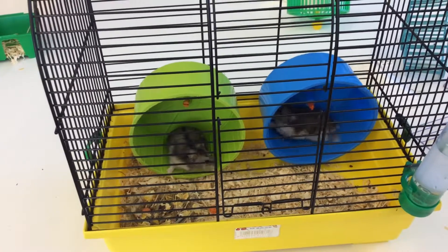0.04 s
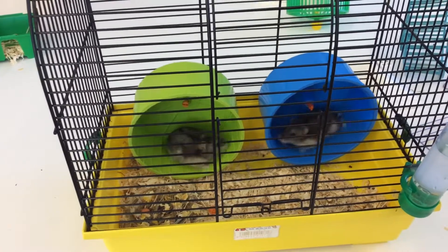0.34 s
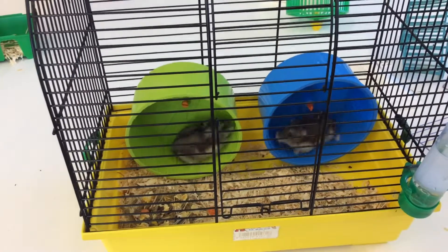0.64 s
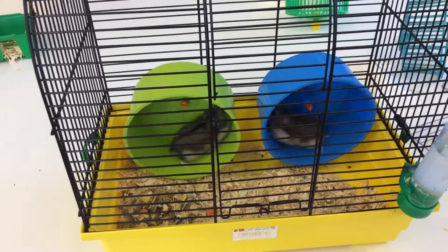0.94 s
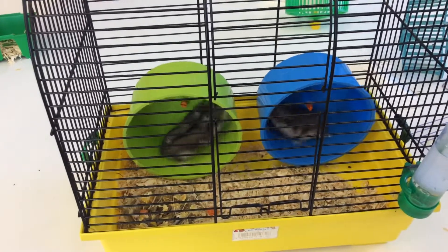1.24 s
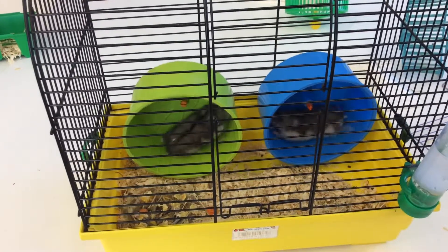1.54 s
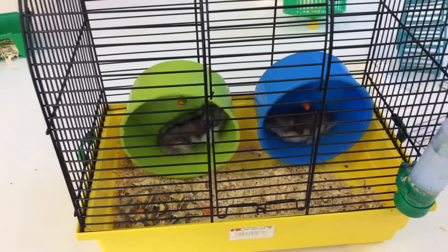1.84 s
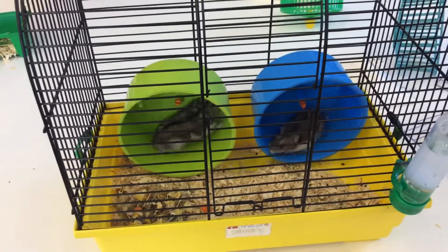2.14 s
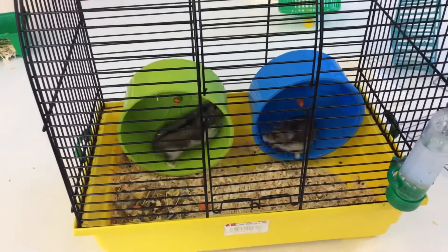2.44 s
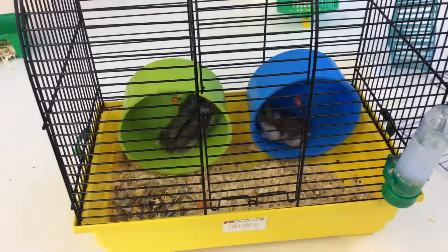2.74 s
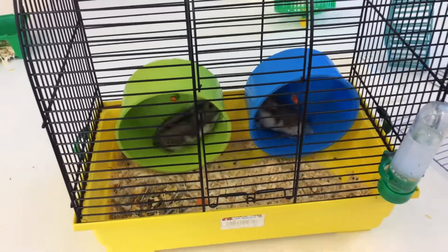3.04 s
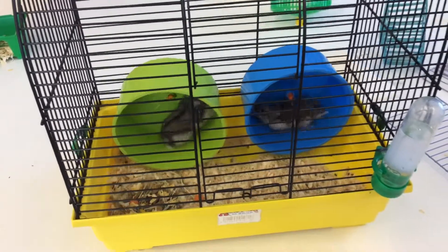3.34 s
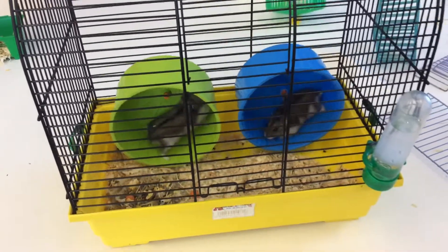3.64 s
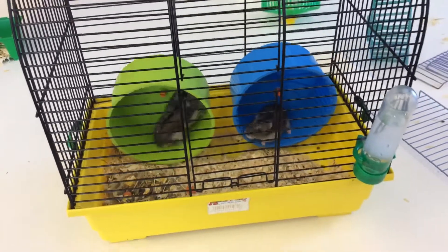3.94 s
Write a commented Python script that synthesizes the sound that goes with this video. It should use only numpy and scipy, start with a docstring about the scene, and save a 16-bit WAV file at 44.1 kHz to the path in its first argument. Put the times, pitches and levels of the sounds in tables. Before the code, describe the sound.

Hamsters run in plastic wheels, which knock and rattle with a faint axle squeak in the first half second. A softly rumbling lull follows. High squeaks return at about 1.1 seconds, joined by harder knocks and hollow thuds until 2. Claws patter and scrabble from 2 to 3 seconds. More knocks lead into the loudest squeaks, from 3.2 to 3.7, and two last knocks sound over a faint room hush.

```python
"""Two hamsters run in plastic wheels in a wire cage, in a small room. At first the wheels knock on their
loose axles, each impact ringing their modes, and a dry axle squeaks faintly by stick-slip friction.
In a lull the tray rumbles under soft footfalls. After a second the squeaks return, then harder knocks
and the hollow thuds of running bodies. Claws patter and scrabble on the plastic through the third
second; the loudest bout of squeaks follows, and two last knocks sound over the still air."""
import sys
import numpy as np
from scipy import signal
from scipy.fft import rfft, irfft
from scipy.io import wavfile

SR = 44100
rng = np.random.default_rng(int(sys.argv[2]) if len(sys.argv) > 2 else 0)


def master(y):
    """Save y as 16-bit WAV."""
    cut = np.clip(np.atleast_2d(y).T, -1, 1)
    pcm = np.round(cut * 32767)  # scale
    wavfile.write(sys.argv[1], SR, pcm.astype(np.int16))


N = 176400
TIME = np.arange(N) / SR

# Levels in the tables are relative, within each table.
# impacts of a wheel on its axle: start_s, level_db, heaviness_db (heavier is duller)
KNOCKS = [(0.014, -35.5, -11.5), (0.024, -38.5, -9), (0.065, -32, 0.5), (0.111, -38, -11),
          (0.147, -32, -1.5), (0.172, -39.5, -11.5), (0.223, -34, -10), (0.234, -36, -1),
          (0.286, -33, -5.5), (0.444, -44, -10), (0.566, -46, -14.5), (1.147, -46, -8), (1.332, -30.5, -7),
          (1.356, -42.5, -13.5), (1.397, -35.5, -11), (1.418, -31, -0.5), (1.462, -35, -11),
          (1.472, -30, -7), (1.508, -31.5, -14), (1.541, -28, 6), (1.606, -37, -15), (1.629, -38, -6),
          (1.741, -37, 1), (1.839, -41.5, -9), (1.895, -41.5, -8), (1.945, -32.5, 0), (2.065, -40.5, -9),
          (2.276, -38.5, -13.5), (2.2864, -28.5, -15), (2.549, -45.5, -8), (2.924, -41.5, -4),
          (3.017, -46, -15), (3.076, -35, -1), (3.097, -33, -3.5), (3.126, -38, -6), (3.163, -32, -2),
          (3.21, -33.5, -5.5), (3.257, -41.5, 6), (3.84, -40.5, -10.5), (3.883, -36.5, -6.5)]
# normal modes of wheel and cage: pitch_hz, level_db, t60_s
WHEEL_MODES = [(174.6,-21,0.09),(241.5,-31,0.39),(376.5,-6,0.11),(521.7,-4,0.066),(571,-11.5,0.068),(627,-14.5,0.032),(928.5,-10,0.049),(1006,-9,0.051),(1069,-6,0.028),(1239,-10.5,0.048),(1455,-16,0.039),(1670,-16,0.042),(1838,-19.5,0.045),(2107,-11.5,0.037),(2340,-13,0.02)]
# bumps of a body against a wheel: start_s, pitch_hz, level_db
THUDS = [(0.274,190,-50.5),(0.815,688,-57),(1.425,128,-50),(1.471,372.4,-35),(1.61,662,-44.5),(1.642,178,-40.5),(1.69,239,-46),(1.837,362.5,-37),(2.166,347,-44),(2.334,479,-41),(2.548,209,-51),(2.581,240,-53)]
# envelope of the rolling rattle: time_s, level_db
RATTLE_LEVEL = [(0.0, -44), (0.02, -46), (0.3, -64), (0.32, -56.5), (1.08, -79), (1.3, -65), (1.34, -59),
                (1.38, -55), (1.47, -44.5), (1.65, -52.5), (2.16, -54), (2.26, -89), (2.28, -42),
                (2.46, -55.5), (2.86, -67), (2.93, -53), (2.97, -52.5), (3.17, -46.5), (3.3, -54.5),
                (3.79, -69), (3.85, -76), (4.0, -56.5)]
# envelope of the tray's rumble: time_s, level_db
TRAY_LEVEL = [(0.0, -59), (0.21, -77), (0.28, -58.5), (0.41, -75), (0.47, -55.5), (0.52, -66.5),
              (0.61, -57.5), (0.67, -66), (1.29, -70.5), (1.32, -77), (1.59, -59), (1.64, -50), (1.82, -57),
              (2.34, -59.5), (2.45, -62.5), (2.6, -60), (2.67, -89), (2.71, -65), (2.97, -82), (3.21, -63),
              (3.24, -59.5), (3.82, -72.5), (3.88, -66.5), (4.0, -72.5)]
# response of the tray: frequency_hz, gain_db
TRAY_SPECTRUM = [(40,-26.5),(110,-1),(170,-1.5),(300,4),(450,0),(680,-6),(850,-13.5),(2200,-18),(4000,-31),(16000,-82)]
# slips of the axle: start_s, length_s, pitch_hz, level_db, overtones_db, wobble_hz
SQUEAKS = [(0.0,0.34,2910,-68,-30,103),(0.313,0.057,3002,-55,-10,25),(0.37,0.052,2984,-57,-15,21),(0.438,0.03,2930,-57.5,-17,30),
           (1.122,0.015,2910,-51.5,-38,29),(1.146,0.037,3010,-58,-18,32),(1.181,0.064,3102,-45.5,-5.5,59),(1.233,0.0376,3110,-46,-2,45),(1.268,0.052,2949,-43,-44,12),(1.319,0.029,2978,-43.5,-8,39),
           (1.398,0.099,3040,-66.5,-8,64),(1.611,0.035,3064,-47,-6.5,123),(1.649,0.027,3000,-47.5,-13,115),(1.744,0.028,2956,-53.5,-17,46),(1.845,0.032,3080,-58,-3.5,96),(1.945,0.025,2960,-60.5,-20,33),
           (3.228,0.011,2953,-47.5,-8.5,43),(3.245,0.038,2995,-57.5,-18,32),(3.273,0.03,3090,-48,-1,60),(3.302,0.029,3140,-45.5,2,62),(3.33,0.015,3020,-41,-10,69),(3.368,0.009,3100,-43.5,1.5,40),(3.377,0.038,2955,-36.5,-20,21),
           (3.415,0.073,3165,-42,-1.5,34),(3.488,0.0067,2970,-37,-12,40),(3.499,0.039,3114,-54.5,-7,64),(3.541,0.025,3130,-53,6.5,41),(3.572,0.012,2987,-44,-13,60),(3.59,0.014,3006,-48,-11,58),(3.613,0.014,2963,-47.5,-22,40),(3.632,0.045,3030,-55.5,-40.5,70)]
# harmonics of a squeak: harmonic_number, level_db
OVERTONES = [(2,-5.5),(3,-2),(4,-16),(5,-20)]
# reflections of the squeak from wheel, tray and table: delay_s, gain_db
ECHOES = [(.0023,-11),(.0052,-12),(.0091,-13),(.0137,-14)]
# sharp claw strikes: peak_s, level_db, body_db (low band relative to high)
CLAW_STRIKES = [(0.025, -52.5, -6.5), (0.8796, -45, -15), (0.939, -56.5, -10.5), (1.2685, -44, -27),
                (1.341, -40.5, -14), (1.3842, -42.5, -19), (1.43, -44.5, -7.5), (1.5765, -48.5, -17),
                (1.6063, -47, -4), (1.702, -45, -34), (1.8208, -50, -10), (1.839, -46.5, -13),
                (1.9212, -44, -15), (2.1, -41, -33), (2.26, -45.5, -17), (2.3438, -50.5, -5),
                (2.4182, -50.5, -7.5), (2.498, -49, -21), (2.524, -45, -16), (2.552, -49.5, -13),
                (2.57, -46, -9.5), (2.6628, -42.5, -18), (2.6993, -40.5, -18), (2.7174, -50.5, -19),
                (2.915, -43.5, -28), (2.9376, -38.5, -16), (3.0346, -44.5, -11), (3.075, -48.5, -8.5),
                (3.3681, -46, -12), (3.726, -51.5, -21), (3.7628, -45.5, -13), (3.809, -46, -14),
                (3.871, -44.5, -18), (3.933, -46.5, -24)]
# envelope of the scratching feet: time_s, level_db
SCRATCH_LEVEL = [(0.0, -66), (0.34, -68.5), (0.61, -71.5), (0.99, -76.5), (1.15, -63), (1.39, -87),
                 (1.49, -71), (1.65, -59.5), (1.87, -71.5), (2.35, -61.5), (2.54, -66), (2.67, -72),
                 (2.78, -69), (3.12, -58.5), (3.44, -78), (3.56, -69), (3.89, -64), (4.0, -80)]
# spectrum of claw scratches and axle rasp: frequency_hz, gain_db
FRICTION_SPECTRUM = [(100,-39),(1500,-1.5),(3500,4.5),(4600,-1),(7000,0),(8500,6),(11000,4),(15500,-3)]
# a foot scrabbling for grip: start_s, length_s, level_db
SCRABBLES = [(0.006,0.036,-65.5),(0.068,.028,-68),(0.101,0.014,-61),(0.155,0.031,-62),(1.395,0.031,-58.5),(1.432,0.047,-58.5),(1.51,0.0091,-55.5),(1.527,0.026,-57.5),(1.915,0.041,-57),(2.106,0.0051,-53.5),(2.936,0.019,-59),(2.705,0.028,-59.5),(3.552,.035,-58),(3.93,0.017,-62)]
# spectrum of its ticks: frequency_hz, gain_db
SCRABBLE_SPECTRUM = [(500,-24),(2500,-1),(5500,-6),(8500,0),(11000,0.5),(15500,-1.5)]
# still air of the room: frequency_hz, gain_db
AIR_SPECTRUM = [(15, -59), (25, -2.5), (69, 11.5), (313, -2.5), (389, 5), (762, -17.5), (1490, -15.5),
                (2120, -13), (4380, -26.5), (7100, -20.5), (8350, -23.5), (15500, -33)]


def knocks(contacts=4, rebound_s=0.008, first_loss_db=11.25, later_loss_db=7.5):
    """Inelastic impact: a wheel drops against its axle and loses energy at every rebound."""
    start_s, level_db, heaviness_db = np.transpose(KNOCKS)[:, :, None]
    gaps = rebound_s * rng.uniform(0.3994, 1.6, (len(start_s), contacts))
    times = start_s + np.cumsum(gaps, axis=1) - gaps
    bounce = np.arange(contacts)
    loss_db = (bounce > 0) * (first_loss_db + later_loss_db * (bounce - 1))
    sizes = from_db(level_db - 7 - loss_db)
    upper_db = np.repeat(-10 - heaviness_db, contacts)
    return wheel(times.ravel(), sizes.ravel(), upper_db)


def wheel(times, sizes, upper_db, scatter_db=3.5, split_hz=800, grind_s=0.0035, top_hz=2680):
    """Modal superposition: each contact cracks, grinds and rings the modes in a mixture of its own."""
    upper = from_db(upper_db)
    contact = clicks(times, sizes * upper)
    grind_envelope = signal.lfilter([1], [1, -np.exp(-1 / (grind_s * SR))], contact + 1e-18)
    out = from_db(17) * contact + from_db(-15) * grind_envelope * rng.standard_normal(N)
    for k, (hz, db, t60_s) in enumerate(WHEEL_MODES):
        scatter = scatter_db * rng.standard_normal(len(times))
        strength = sizes * from_db(db + scatter) * (upper if hz > split_hz else 1)
        out += (-1) ** k * ring(clicks(times, strength), hz, t60_s)
    # the knocks and their ringing carry little treble
    return signal.sosfilt(signal.butter(6, top_hz, fs=SR, output="sos"), out)


def thuds(push_s=0.0019, t60_s=0.13):
    """Damped free vibration: a body's soft push leaves a hollow note, pitched by where it lands."""
    out = np.zeros(N)
    for start_s, hz, db in THUDS:
        age = np.maximum(TIME - start_s, 0)
        envelope = from_db(db - 60 * age / t60_s) * (1 - np.exp(-age / push_s))
        out += envelope * np.sin(2 * np.pi * hz * age)
    return out


def rolling():
    """Random excitation: footfalls and play in the axles rattle the wheels and shake the tray."""
    impacts = grains(per_s=300, spread_db=3)
    hits = np.flatnonzero(impacts)
    rattle = unit_power(wheel(hits / SR, impacts[hits], upper_db=-2, scatter_db=4))
    rumble = colour(grains(per_s=500, spread_db=2.5), TRAY_SPECTRUM)
    return from_db(-7) * level(RATTLE_LEVEL) * rattle + from_db(1) * level(TRAY_LEVEL) * rumble


def axle(judder_hz=55, edge_s=0.006, flutter_db=2, rasp_db=-26):
    """Stick-slip friction: nearly a pure tone under light rubbing, higher and shriller when pressed."""
    judder_rate = judder_hz * (1 + 0.45 * drift(39.76))
    judder = np.sin(2 * np.pi * np.cumsum(judder_rate) / SR)
    wobble = judder + 0.38 * drift(340)   # rough surfaces add jitter to the pitch
    roughness = [unit_power(1 + 0.3 * drift(220)) for _ in OVERTONES]
    flutter = from_db(flutter_db * np.clip(drift(80), -2, 2))
    out = np.zeros(N)
    for start_s, length_s, hz, db, overtones_db, wobble_hz in SQUEAKS:
        ramp = gate(start_s, length_s, edge_s)
        on = ramp > 0
        phase = 2 * np.pi * np.cumsum(hz + wobble_hz * wobble[on]) / SR
        tone = np.sin(phase)
        for (harmonic, harmonic_db), rough in zip(OVERTONES, roughness):
            tone += from_db(overtones_db + harmonic_db) * rough[on] * np.sin(harmonic * phase)
        envelope = np.sin(np.pi / 2 * ramp[on]) ** 2
        out[on] += np.sqrt(2) * from_db(db - 2.5) * envelope * tone
    rasp = colour(np.abs(out) * grains(per_s=4000, spread_db=-0.5), FRICTION_SPECTRUM)
    return out * flutter + from_db(rasp_db) * rasp


def claws(rise_s=0.0028, split_hz=7050, step_rate_hz=35, step_swing_db=3):
    """Friction noise from tiny impacts: claws scratch in uneven steps, and some strike hard and skid."""
    peak_s, level_db, body_db = np.transpose(CLAW_STRIKES)
    age = TIME[:SR // 10] / rise_s
    swell = (age * np.exp(1 - age)) ** 2
    skids = np.zeros(N)
    for band, band_db in (("high", level_db - 5.5), ("low", level_db + body_db + 3)):
        envelope = signal.fftconvolve(clicks(peak_s - rise_s, from_db(band_db)), swell)[:N]
        band_filter = signal.butter(3, split_hz, band, fs=SR, output="sos")
        skids += signal.sosfilt(band_filter, envelope * grains(per_s=5000, spread_db=2))
    steps = unit_power(from_db(step_swing_db * np.clip(drift(step_rate_hz), -2, 2)))
    scratch = from_db(-2.5) * level(SCRATCH_LEVEL) * steps * grains(per_s=2500, spread_db=2.5)
    return colour(scratch + skids, FRICTION_SPECTRUM)


def scrabbles(edge_s=0.0022):
    """Shot noise: as a foot seeks grip, dense claw ticks merge into a short, crisp burst."""
    grip = sum(from_db(db) * gate(start_s, length_s, edge_s) for start_s, length_s, db in SCRABBLES)
    return colour(grip * grains(per_s=2200, spread_db=1), SCRABBLE_SPECTRUM)


def reflections(x):
    """Early reflection: nearby surfaces return delayed, weaker copies of the sound."""
    return x + sum(from_db(db) * np.interp(TIME - delay_s, TIME, x, left=0) for delay_s, db in ECHOES)


def room(x, wet_db, t60_s=0.59, gap_s=0.0065):
    """Reverberation: a diffuse field follows the direct sound and decays exponentially."""
    t = TIME[:SR]
    tail = rng.standard_normal(SR) * np.exp(-np.log(1000) * t / t60_s) * (t > gap_s)
    return x + from_db(wet_db) * signal.fftconvolve(x, tail / np.linalg.norm(tail))[:N]


def air(level_db=-65.5):
    """Stationary noise: the still air of the room is a faint, low hush."""
    return from_db(level_db) * unit_power(colour(rng.standard_normal(N), AIR_SPECTRUM))


def from_db(db):
    """Amplitude ratio of a level in decibels."""
    return 10 ** (np.asarray(db) / 20)


def unit_power(x):
    """Normalisation to a mean square of one."""
    return x / np.sqrt(np.mean(x ** 2) + 1e-20)


def level(rows):
    """Amplitude envelope through (time_s, level_db) points."""
    return from_db(np.interp(TIME, *np.transpose(rows)))


def gate(start_s, length_s, edge_s):
    """Trapezoidal window, half open at its start and end times."""
    return np.clip(np.minimum(TIME - start_s, start_s + length_s - TIME) / edge_s + 0.5, 0, 1)


def drift(rate_hz):
    """Low-pass noise: a random wander of unit power."""
    pole = np.exp(-2 * np.pi * rate_hz / SR)
    wander = signal.lfilter([1], [1, -2 * pole, pole * pole], rng.standard_normal(N + SR))
    return unit_power(wander[SR:])


def colour(x, spectrum):
    """Minimum-phase filter of unit power gain, shaped by (frequency_hz, gain_db) points."""
    hz, db = np.transpose(spectrum)
    grid_hz = np.linspace(1, SR / 2, 2049)
    magnitude = unit_power(from_db(np.interp(np.log(grid_hz), np.log(hz), db)))
    cepstrum = irfft(np.log(magnitude))
    half = len(cepstrum) // 2
    causal = np.r_[cepstrum[0], 2 * cepstrum[1:half], np.zeros(half)]
    return signal.fftconvolve(x, irfft(np.exp(rfft(causal))))[:N]


def clicks(times, sizes):
    """Ideal impulses at the given times in seconds."""
    return np.bincount(np.clip(times * SR, 0, N).astype(int), sizes, N + 1)[:N]


def grains(per_s, spread_db):
    """Poisson process of tiny impacts, uneven in size, at unit power."""
    sizes = from_db(spread_db * np.minimum(rng.exponential(1, N), 4)) * rng.choice([-1, 1], N)
    return unit_power(sizes * (rng.random(N) < per_s / SR))


def ring(x, hz, t60_s):
    """Damped resonator: one mode, falling 60 dB in t60_s."""
    radius = np.exp(-np.log(1000) / (t60_s * SR))
    real_part = radius * np.cos(2 * np.pi * hz / SR)
    return signal.lfilter([1, -real_part], [1, -2 * real_part, radius * radius], x + 1e-18)


def scene():
    """Superposition: wheels, claws and axle reverberate in the room and add to the still air."""
    hush = air()
    wheels = room(knocks() + thuds() + rolling(), wet_db=-9)
    feet = room(claws() + scrabbles(), wet_db=-6.5)
    squeaks = room(reflections(axle()), wet_db=-8.5)
    return (wheels + feet + squeaks + hush)[None]


def record(dry):
    """Band limiting: a steep low-pass filter removes the treble above 15.9 kHz."""
    return signal.sosfilt(signal.ellip(10, 0.2, 70, 15900, fs=SR, output="sos"), dry)


dry = scene()
out = record(dry)
master(out)
```